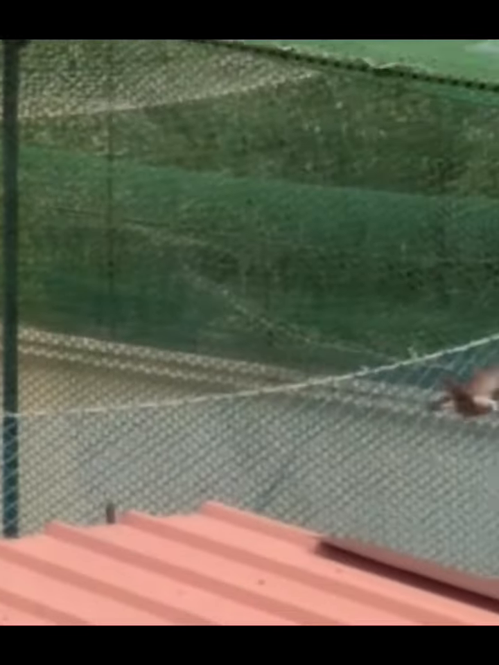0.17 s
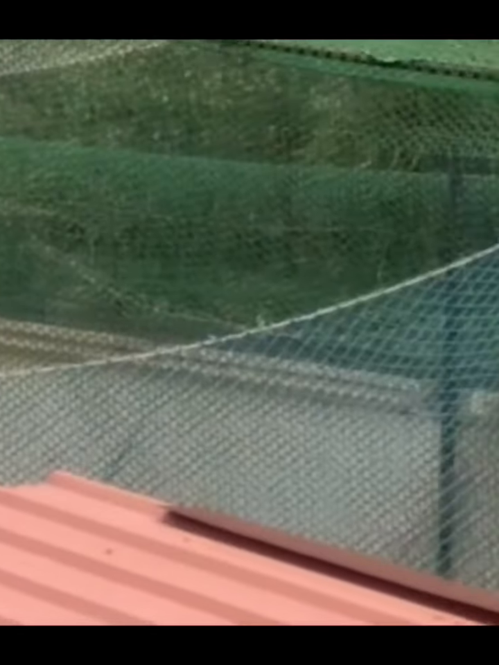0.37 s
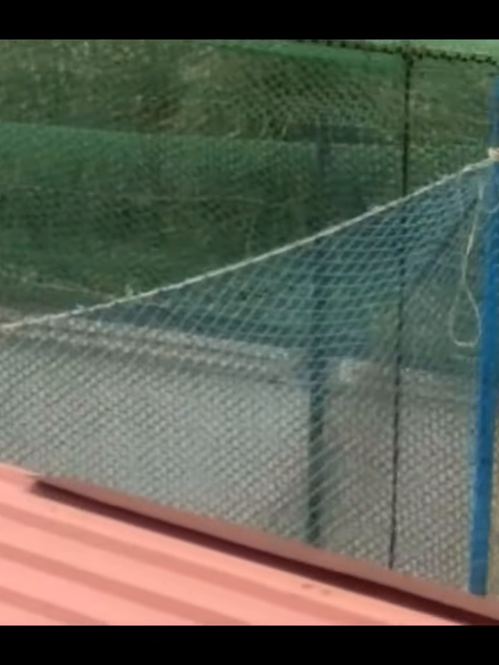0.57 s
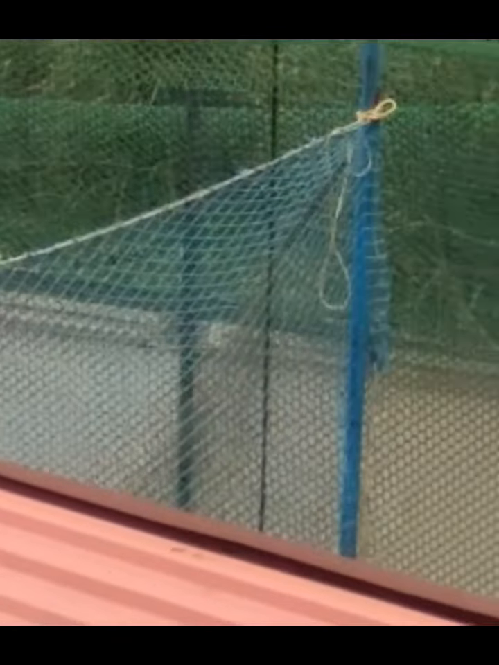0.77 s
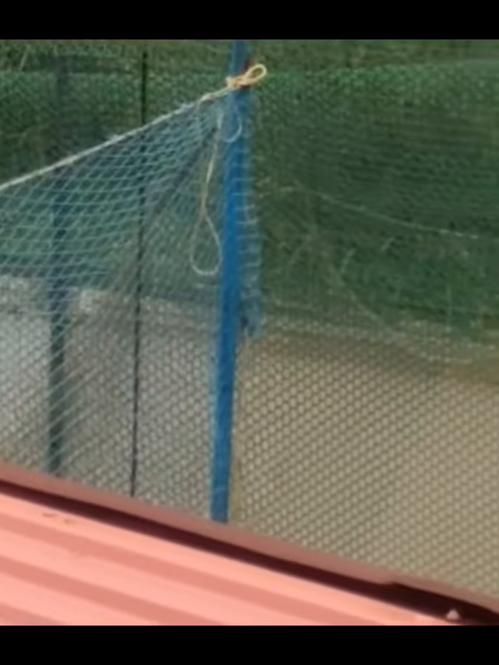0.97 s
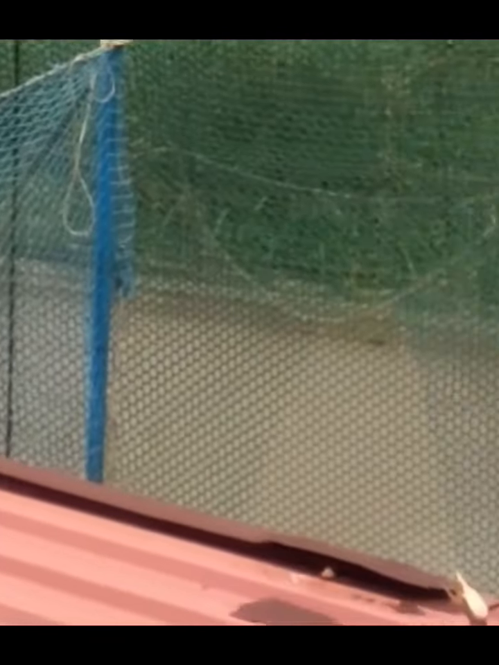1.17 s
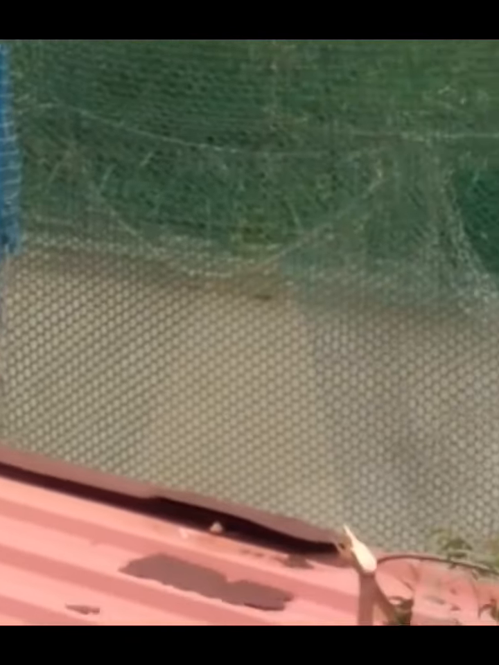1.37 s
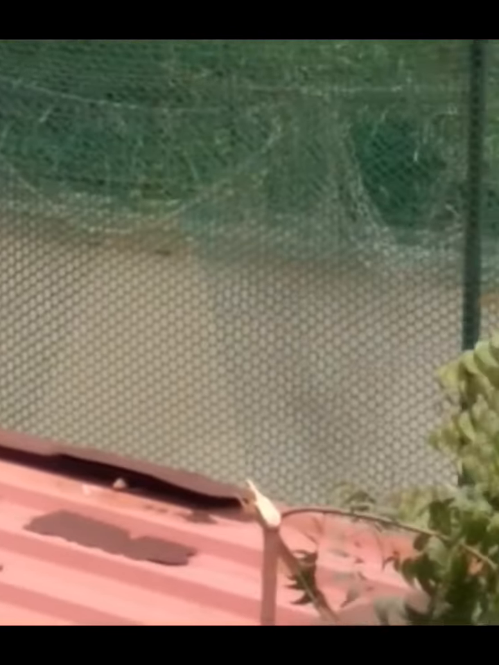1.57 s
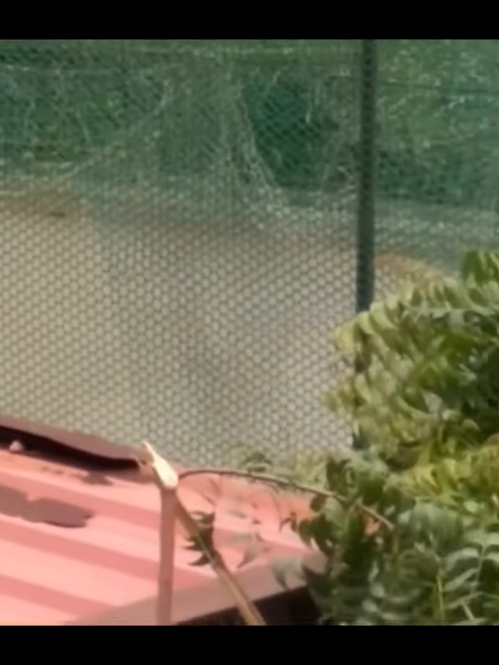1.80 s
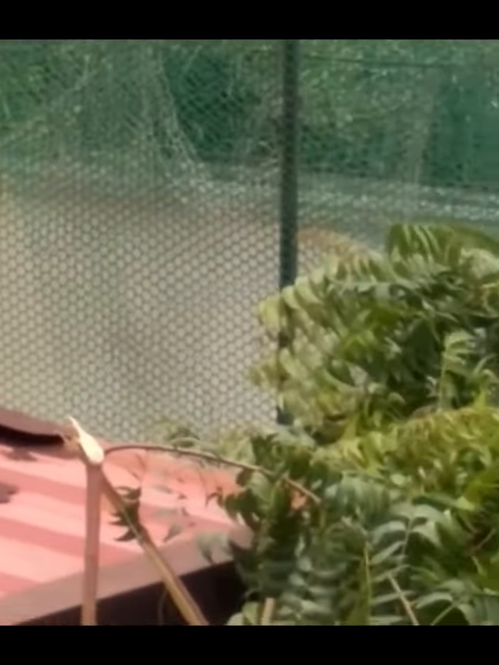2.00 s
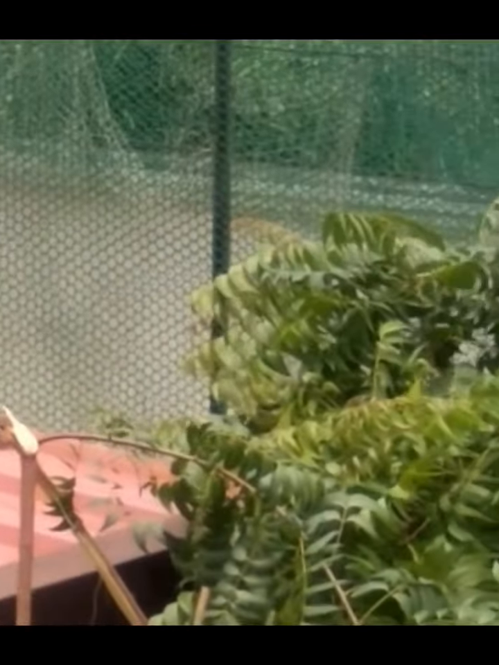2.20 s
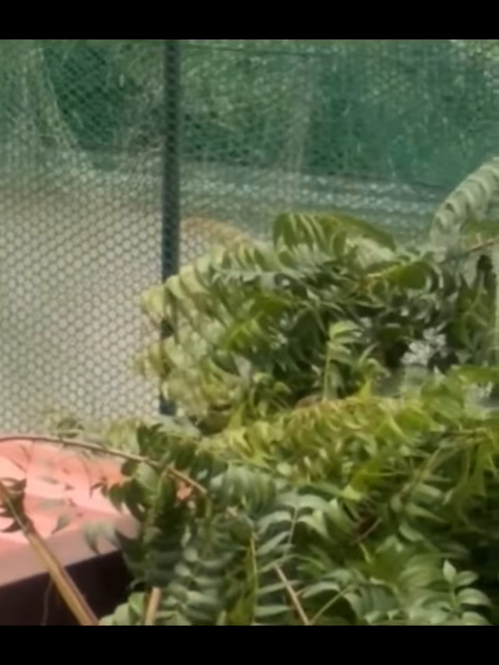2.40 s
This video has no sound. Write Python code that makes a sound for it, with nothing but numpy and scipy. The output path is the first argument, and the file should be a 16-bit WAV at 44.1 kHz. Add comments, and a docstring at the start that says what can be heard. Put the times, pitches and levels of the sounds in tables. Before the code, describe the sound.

Several birds call in a quick run of high, ringing, falling peeps, overlapped by lower reedy squeaks. The calls echo slightly in a yard, over low rumble, hiss and a distant machine hum. Two soft bumps come midway.

```python
"""Ringing, downslurred peeps near 4 kHz over rumble and hiss: a party of babblers in a yard, on two mics.
Lower, reedy squeaks overlap them. In some peeps the other side of the syrinx joins in and the two voices
mix into a harsh stack of tones. Walls and a metal roof answer. Farther off a bird holds one thin note
at the start and a machine hums throughout; about a second in, something bumps softly twice."""
import sys
import numpy as np
from scipy import signal
from scipy.fft import rfft, irfft, next_fast_len
from scipy.io import wavfile
from scipy.ndimage import map_coordinates

SR = 44100
rng = np.random.default_rng(int(sys.argv[2]) if len(sys.argv) > 2 else 0)


def materialize(psi):
    """Save the field psi as 16-bit PCM at rate SR to the path in sys.argv[1].

    A 1-D psi becomes a single channel; in a 2-D psi each row is a channel.
    """
    bounded = np.clip(np.atleast_2d(psi).T, -1, 1)
    quanta = np.round(bounded * 32767).astype(np.int16)
    wavfile.write(sys.argv[1], SR, quanta)


N = 108045

# How alike the background is at the two microphones: frequency_hz, correlation
MIC_LIKENESS = [(60, 0.92), (125, 1), (250, 0.66), (500, 0.71), (1000, -0.16), (2500, -0.14),
                (10000, -0.061)]
FLUTTER_DB, RASP = 2.5, 0.45  # a call's level tremble; noise share of an overtone per unit of roughness


def amp(db):
    """Decibels to gain."""
    return 10 ** (np.asarray(db) / 20)


def pan(left_over_right_db):
    """Gains at the left and right microphones."""
    return amp([[left_over_right_db / 2], [-left_over_right_db / 2]])


def along(points, hz):
    """Read (frequency_hz, value) points on a log frequency axis."""
    frequencies, values = np.transpose(points)
    return np.interp(np.log(hz + 1), np.log(frequencies + 1), values)


def wobble(knots_per_s, t):
    """A smooth random curve."""
    return map_coordinates(rng.standard_normal(1024), [t * knots_per_s], mode="wrap")


def filtered(x, response):
    """Apply a gain that depends on frequency."""
    size = next_fast_len(N + SR // 2)
    return irfft(rfft(x, size) * response(np.fft.rfftfreq(size, 1 / SR)), size)[..., :N]


def phase(hz):
    """Running phase of a pitch curve."""
    return 2 * np.pi * np.cumsum(hz) / SR


def add(out, start_s, sound):
    """Mix a sound in at its start time."""
    part = out[:, round(start_s * SR):][:, :sound.shape[1]]
    part += sound[:, :part.shape[1]]


def spread(hz):
    """Mid-side angle that gives the microphones their likeness."""
    return np.arccos(np.clip(along(MIC_LIKENESS, hz), -1, 1)) / 2


def rush(spectrum):
    """Stereo noise of rms 1, alike in the bass and nearly unrelated in the treble."""
    def response(hz):
        return amp(along(spectrum, hz)) * [np.cos(spread(hz)), np.sin(spread(hz))]
    mid, side = filtered(rng.standard_normal((2, N)), response)
    noise = np.array([mid + side, mid - side])
    return noise / np.sqrt(np.mean(noise ** 2))


def rumble(t, level_db=-36.5, drift_db=0.7):
    """Low outdoor air, drifting a little in level."""
    spectrum = [(20, -16), (46, -11.5), (72, -14.5), (100, -8.5), (160, -9), (300, -7.5), (450, -12.5),
                (750, -11.5), (1000, -13), (1600, -18), (2600, -19.5), (5000, -34)]  # noise colour: frequency_hz, relative_db
    return amp(level_db + drift_db * wobble(3.6, t)) * rush(spectrum)


def hiss(t, level_db=-38.5, drift_db=0.7):
    """A fine, wide hiss, strongest near 4 kHz."""
    spectrum = [(1500, -26), (2600, 1.5), (3400, -8), (3950, 16), (4900, 2), (6000, 9.5), (7000, -1),
                (8400, 7.5), (10000, 1), (12200, 5), (13500, -8), (16000, -41)]  # noise colour: frequency_hz, relative_db
    return amp(level_db + drift_db * wobble(4.3, t)) * rush(spectrum)


def machine_hum(t, waver_hz=1.46, waver_db=3.5, waver_per_s=7):
    """Slightly unsteady tones of a distant machine."""
    tones = [(43, -49), (97, -67), (370, -44), (395, -46.5), (602, -49), (835, -44.5)]  # lines of the hum: pitch_hz, level_db
    out = np.zeros((2, N))
    for hz, db in tones:
        cycle = phase(hz + waver_hz * wobble(waver_per_s, t))
        for mic, side in zip(out, (1, -1)):
            gain = np.sqrt(2) * amp(db + waver_db * wobble(waver_per_s, t))
            mic += gain * np.sin(cycle + side * spread(hz))
    return out


def voice(hz, roughness, t, jitter=0.017, jitter_per_s=650):
    """Phase of one side of the syrinx, its pitch trembling with roughness."""
    return phase(hz * (1 + jitter * roughness * wobble(jitter_per_s, t)))


def envelope(t, length_s, attack_s, release_s, middle_db, flutter_db=FLUTTER_DB):
    """Attack, fluttering hold, release; middle_db sets the middle of the call against its ends."""
    gate = np.clip(t / attack_s, 0, 1) * np.clip((length_s - t) / release_s + 0.5, 0, 1)
    arch = np.sin(np.pi * np.clip(t / length_s, 0, 1)) - 1
    return np.sqrt(2) * gate * amp(middle_db * arch + flutter_db * wobble(166, t))


def yard(call, pan_db, tail_db=-7, walls_db=-8, walls_s=0.022, mic_lag_s=3e-4):
    """The direct call, a few wall echoes and a diffuse tail, different from every perch."""
    decay = [(2000, .7), (4000, .53), (8000, .6), (14000, .5)]  # the yard's reverberation: frequency_hz, t60_s
    hz, t, noise = signal.stft(rng.standard_normal((2, SR // 2)), SR, nperseg=256)
    tail = signal.istft(noise * amp(-60 * t / along(decay, hz)[:, None]), SR, nperseg=256)[1]
    answer = amp(tail_db) * tail / np.linalg.norm(tail[0])
    for mic in answer:
        delays = (walls_s * SR * rng.uniform(0.11, 1, size=8)).astype(int)
        mic[delays] += amp(walls_db) / np.sqrt(len(delays))
        mic[round(rng.uniform(0, mic_lag_s) * SR)] += 1  # direct sound reaches each mic at its own time
    heard = signal.fftconvolve(call[None], answer, axes=1)
    heard *= np.linalg.norm(call) / np.linalg.norm(heard, axis=1, keepdims=True)  # keep the energy
    return heard * pan(pan_db)


def far_whistle(pitch_hz=3777, level_db=-40):
    """A bird farther off to the left holds one thin note for the first half second."""
    out, t = np.zeros((2, N)), np.arange(SR // 2) / SR
    tone = amp(level_db) * np.sin(voice(pitch_hz, roughness=0.42, t=t))
    shape = envelope(t, 3.3, attack_s=0.0012, release_s=0.098, middle_db=0.61)  # cut off in its hold
    add(out, 0, yard(tone * shape, pan_db=5))
    return out


def partial(cycle, rasp, t, rasp_per_s=720):
    """One overtone; uneven beating of the membranes turns the share rasp of its power into noise."""
    share = np.clip(rasp, 0, 0.9)
    band = wobble(rasp_per_s, t) * np.sin(cycle) + wobble(rasp_per_s, t) * np.cos(cycle)
    return np.sqrt(1 - share) * np.sin(cycle) + np.sqrt(share / 2) * band


def peeps(second_slur=0.25, bloom_width=0.24, overtone_attack_s=0.0069, second_attack_s=0.019):
    """Peeps slur down and most bloom; overtones rasp, and a second voice adds sum and difference tones."""
    # One peep or echo a row; at 1.224 s the loud peep before it rings back:
    # start_s, length_s, from_hz, toward_hz, slur_s, level_db, harmonic2_db, harmonic3_db,
    # second_voice_hz, second_voice_db, roughness, pan_db, bloom_at (share of the length), bloom_db
    calls = [ (0.024, .088, 4530, 4130, 0.023, -32, -16, -16, 3000, -40, 0.3, 0, 0.6, -1),
             (0.162, 0.068, 4070, 3775, 0.028, -31, -20, -21, 2880, -36, 0.5, -2, 0.3, 2.5),
             (0.227, 0.063, 4210, 3947, 0.04, -23.5, -6, -9, 2870, -10, 0, 4.5, 0.48, 10),
             (.394, 0.06, 4454, 4013, 0.019, -21, -8, -6.5, 2970, -22, 0, -1, 0.8, 9.5),
             (0.583, 0.061, 4260, 3956, 0.025, -25, -7.5, -2, 2850, -36, .55, 0, 0.3, 7),
             (0.581, 0.032, 4610, 4350, 0.078, -26.5, -5.5, -25, 3000, -40, 1.08, -1, 0.2, 4),
             (0.646, 0.056, 4440, 4457, 0.02, -28, -4, -10, 3240, -33, 1.53, -2.5, 0.49, 6.5),
             (0.757, 0.084, 4290, 3873, .017, -22, -16.5, -18, 2860, -28, 0.36, -1, 0, -4.5),
             (0.833, 0.043, 4303, 4175, 0.033, -22.5, -10, -11, 3000, -23, 0.02, 0.5, 1, 13),
             (0.944, 0.07, 4168, 3856, .032, -19, -18, -25, 2940, -31, 0.48, 6, 0.5, -3.5),
             (0.979, 0.056, 4233, 4028, 0.0181, -23.5, -13.5, -15, 3000, -34, 0.23, -7.5, 0.56, 7.5),
             (1.133, 0.089, 4327, 4134, .036, -17.5, -15, -15, 3030, -20.5, 0.1, 2, 0.49, 9.5),
             (1.137, 0.051, 4020, 3900, 0.0243, -28, -11, -6, 3050, -33, 1.07, -10, 0.54, 5.5),
             (1.224, 0.033, 4235, 4170, 0.0091, -27.5, -14, -25, 3020, -20.5, 0.17, 0, 0.7, 4.5),
             (1.337, 0.045, 4340, 4143, 0.037, -24.5, -8.5, -10, 2880, -39, 0, -0.5, 0.27, 4.5),
             (1.360, 0.084, 4297, 3782, 0.079, -17, -16.5, -13, 2880, -56, 0, 0, 0.21, 5.5),
             (1.587, 0.088, 4250, 4060, .045, -20.5, -8.5, -13, 3110, -15, 0.12, 1.5, .78, 5.5),
             (1.673, .086, 3986, 3898, 0.021, -22, -12, -11.5, 3000, -35, 0.31, 0, 0.44, 4),
             (1.838, 0.052, 4316, 4128, .028, -28, -3.5, -5, 3134, -4.5, 0.16, 0, 0.77, 15.5),
             (1.905, 0.03, 4214, 4110, 0.022, -33, 4, -18, 2980, -12, 0.56, 2, 0.44, 13),
             (1.949, 0.069, 3840, 3570, 0.053, -45.5, -14, -12, 2800, -23, .4, 17, 0.14, 4),
             (2.105, .072, 4520, 4350, .025, -28.5, -5.5, -14, 2970, -13, .8, 0, .5, 6),
             (2.096, 0.071, 3930, 3770, .030, -35, -16, -25, 2850, -45, 0.47, -1, 0.88, 1),
             (2.289, 0.083, 4070, 3720, 0.04, -41, -12, -27, 2900, -33, 1, -1, 0.77, 8)]
    mixed_tones = [(0, 1), (1, 1), (2, -1), (2, 1), (3, 1), (0, 2), (1, 2), (2, 2)]  # tones the two voices make: main_multiple, second_multiple
    mixed_levels = [-6, -3.5, -3.5, 2.5, -6.5, -9.5, -6.5, -24]  # strength of each of those tones: relative_db
    out, t = np.zeros((2, N)), np.arange(SR // 6) / SR
    for (start_s, length_s, from_hz, toward_hz, slur_s, level_db, harmonic2_db, harmonic3_db,
         second_hz, second_db, roughness, pan_db, bloom_at, bloom_db) in calls:
        slur_hz = (from_hz - toward_hz) * np.exp(-t / slur_s)
        main = voice(toward_hz + slur_hz, roughness, t)
        second = voice(second_hz + second_slur * slur_hz, roughness + 0.23, t)
        bloom = np.exp(-((t / length_s - bloom_at) / bloom_width) ** 2)
        rasp = 0.11 + RASP * roughness
        overtones = amp(harmonic2_db) * partial(2 * main, rasp, t)
        overtones += amp(harmonic3_db) * partial(3 * main, rasp, t)
        mixed = sum(amp(second_db + db) * partial(a * main + b * second, rasp, t)
                    for (a, b), db in zip(mixed_tones, mixed_levels))
        tone = amp(-3.5 + bloom_db * bloom) * np.sin(main)  # the fundamental swells or dips once
        tone += overtones * np.clip(t / overtone_attack_s, 0, 1)
        tone += mixed * np.clip(t / second_attack_s, 0, 1)
        shape = envelope(t, length_s, attack_s=0.0025, release_s=0.0084, middle_db=-1.5)
        add(out, start_s, yard(amp(level_db) * tone * shape, pan_db))
    return out


def squeaks(scoop_hz=40.6, scoop_s=0.0073, arch_hz=25.7, drop_s=0.0072, fade_db=7):
    """Reedy notes, most strong in even harmonics, that scoop up, glide, then drop, roughen and fade."""
    # One squeak or echo a row; at 0.5 s the squeak before it rings back:
    # start_s, length_s, pitch_hz, glide_hz, drop_hz, harmonic1_db to harmonic5_db, roughness
    calls = [ (0.392, 0.053, 2874, -150, 108, -56, -36, -28.5, -32.5, -70, .56),
             (0.398, 0.063, 3100, -170, 58, -51, -23.5, -59, -33.5, -59, 0.27),
             (0.5, 0.044, 3080, -60.5, 91, -45, -31.5, -64, -32.5, -70, 0.25),
             (.716, 0.082, 3075, 10, 6, -52, -31, -53, -30.5, -61, 0.28),
             (0.751, 0.042, 2955, 5, 30, -46, -29.5, -46, -34, -62, 0.75),
             (0.811, 0.078, 3000, 43, 22, -55, -37, -64, -35.5, -70, 0.2),
             (0.957, 0.038, 2977, -22, 28, -48, -24.5, -60, -20, -60, 0.05),
             (1.097, 0.051, 2760, -44, 40, -53, -46, -37, -36, -58, 0.9),
             (1.114, 0.04, 3080, 40, 17, -46, -26.5, -61, -26.5, -39, 0),
             (1.283, .068, 3110, -91, 200, -26, -35, -54, -44, -56, 0),
             (1.43, 0.036, 2694, -55, 62, -62, -37.5, -40, -43, -65, 0.46),
             (1.471, 0.074, 3087, 10.5, 170, -25, -32, -44, -41.5, -49, 0),
             (1.565, 0.048, 2922, 41, 20, -52, -23, -42, -26.5, -51, 0.37),
             (1.614, 0.081, 3134, -100, 207, -43, -47, -47, -50, -46, 0.61),
             (1.811, 0.044, 2924, 16, 10, -51, -22, -57, -20.5, -75, 0),
             (1.892, 0.021, 3120, -64, 153, -31, -28.5, -39, -29, -58, 0.1),
             (1.903, 0.094, 2818, -34.5, 120, -34.5, -29, -41, -38.5, -46, 0.37),
             (1.972, 0.036, 2863, -30, 80, -34, -43, -54, -40, -58, .6),
             (2.127, 0.059, 2992, -56, 88, -35.5, -33, -48, -61, -59, 0.83),
             (2.428, 0.065, 2910, 0, 48, -42, -33.5, -44, -47, -54, 0.4)]
    out, t = np.zeros((2, N)), np.arange(SR // 6) / SR
    for start_s, length_s, pitch_hz, glide_hz, drop_hz, *harmonics_db, roughness in calls:
        progress = np.clip(t / length_s, 0, 1)
        ending = np.exp(np.minimum((t - length_s) / drop_s, 0))
        hz = pitch_hz + glide_hz * progress + arch_hz * (np.sin(np.pi * progress) - 0.5)
        hz -= scoop_hz * np.exp(-t / scoop_s) + drop_hz * ending
        cycle = voice(hz, roughness, t)
        rasp = RASP * (roughness + ending / 2)
        tone = sum(amp(db) * partial(k * cycle, rasp, t) for k, db in enumerate(harmonics_db, 1))
        shape = envelope(t, length_s, attack_s=0.01, release_s=0.012, middle_db=-2.5,
                         flutter_db=FLUTTER_DB * roughness)
        add(out, start_s, yard(tone * shape * amp(-fade_db * ending), pan_db=-0.3))
    return out


def bumps(t, low_hz=80, attack_s=0.0006):
    """Two soft, dull knocks: bursts of low noise that die away."""
    knocks = [(0.987, -36.5, 0.38, 133), (1.127, -22.5, 0.1, 700)]  # one knock a row: start_s, level_db, t60_s, top_hz
    out = np.zeros((2, N))
    for start_s, level_db, t60_s, top_hz in knocks:
        age = np.maximum(t - start_s, 0)
        colour = [(low_hz / 2, -15), (low_hz, 0), (top_hz, -5), (2.5 * top_hz, -28), (6000, -70)]
        out += rush(colour) * np.clip(age / attack_s, 0, 1) * amp(level_db - 60 * age / t60_s)
    return out


def scene():
    """The birds in the yard, over the low background and the hiss."""
    t = np.arange(N) / SR
    birds = peeps() + squeaks() + far_whistle()
    low = rumble(t) + machine_hum(t) + bumps(t)
    return birds + low * pan(-0.1) + hiss(t)


def record(dry, top_hz=15950):
    """The left microphone is a little louder and brighter; nothing is kept above top_hz."""
    mic_tilt = [(4000, 1.5), (8500, -0.9), (11500, 4.5), (16000, 1.5)]  # balance of the pair: frequency_hz, left_over_right_db
    sides = np.array([[0.5], [-0.5]])
    return filtered(dry, lambda hz: amp(along(mic_tilt, hz) * sides) * (hz < top_hz))


dry = scene()
out = record(dry)
materialize(out)
```